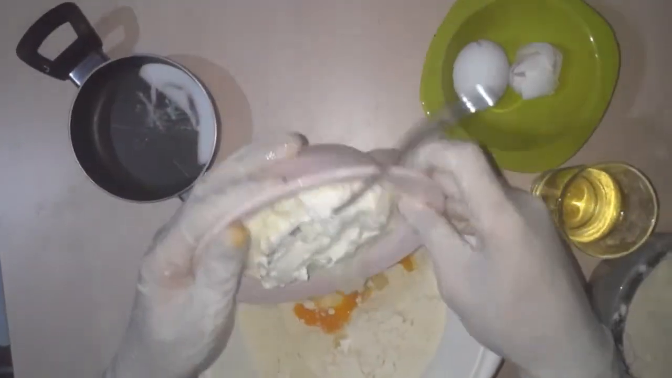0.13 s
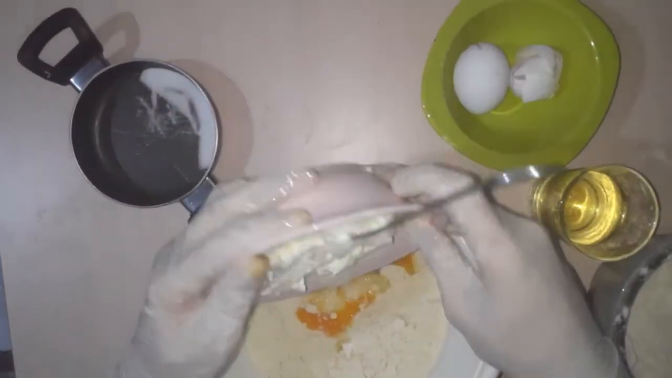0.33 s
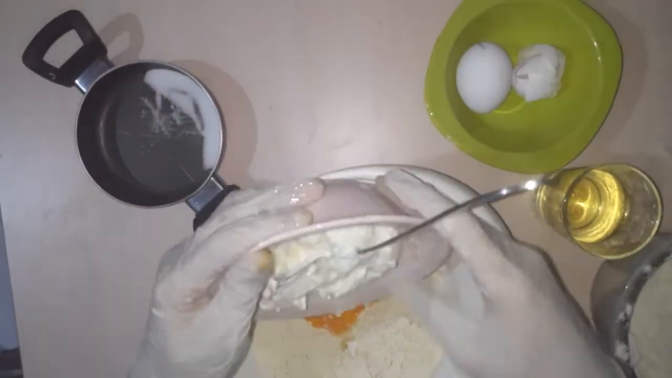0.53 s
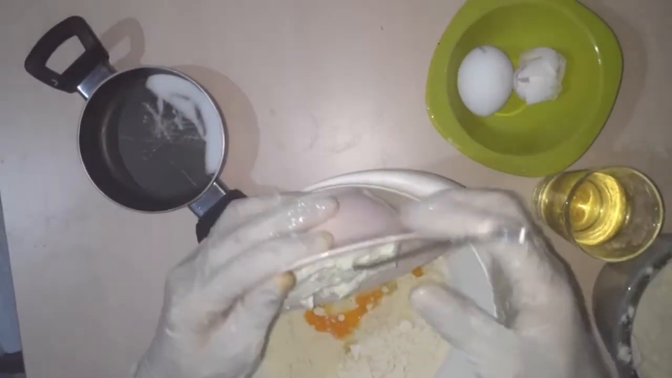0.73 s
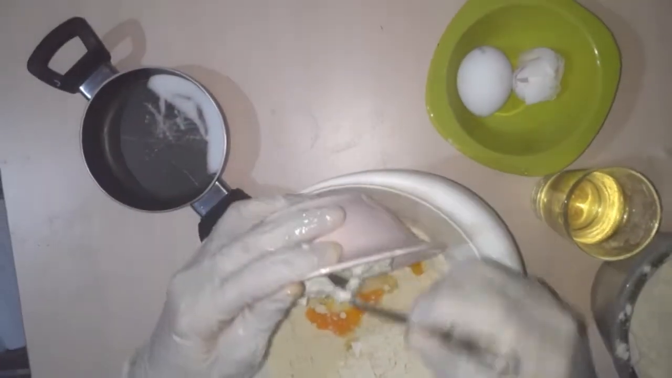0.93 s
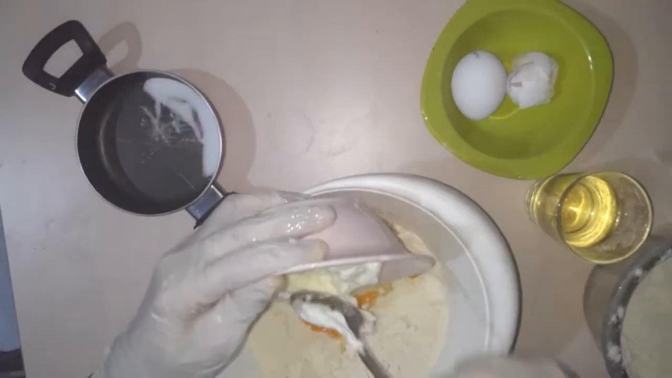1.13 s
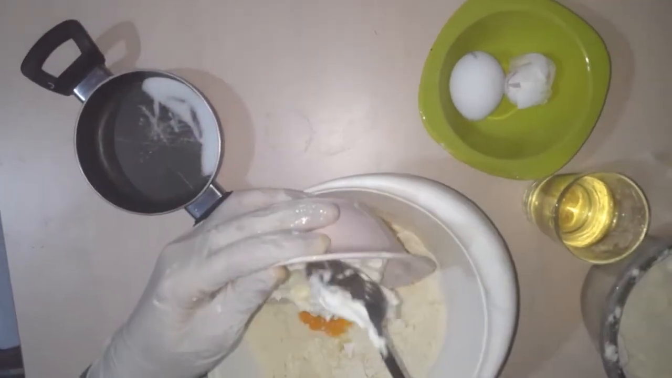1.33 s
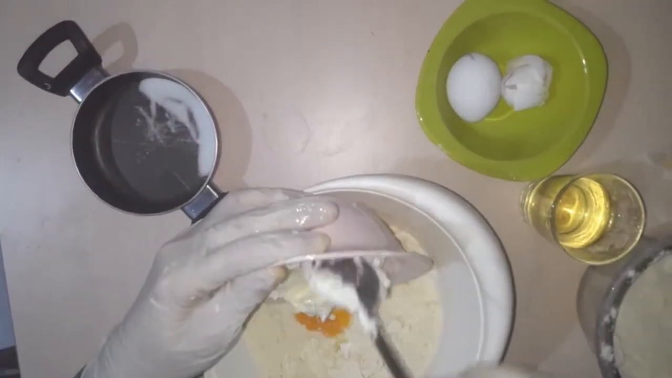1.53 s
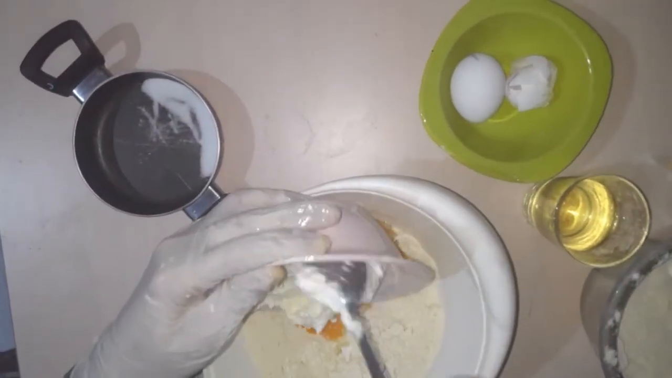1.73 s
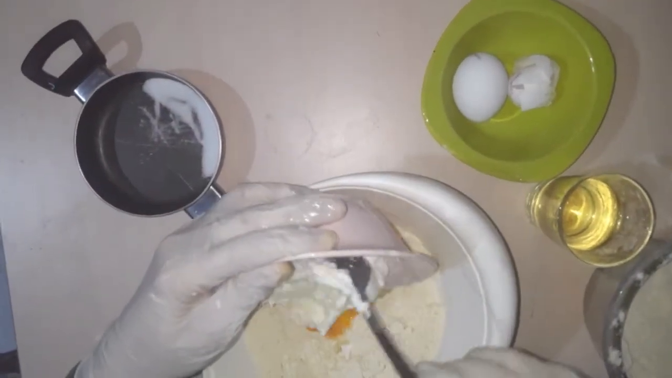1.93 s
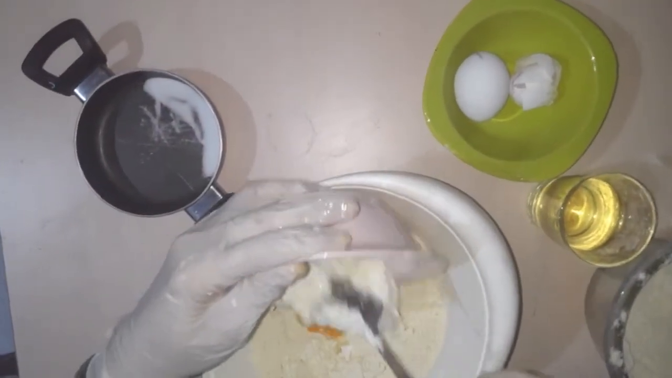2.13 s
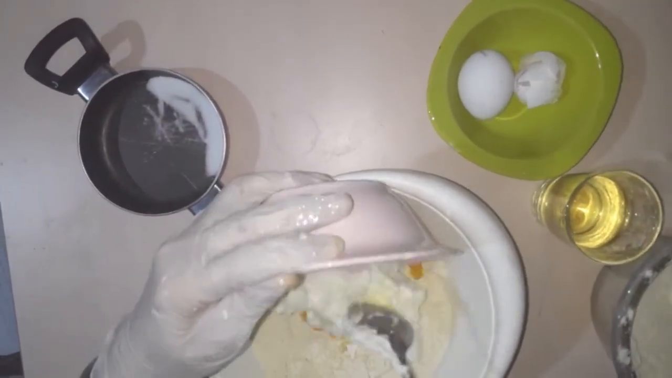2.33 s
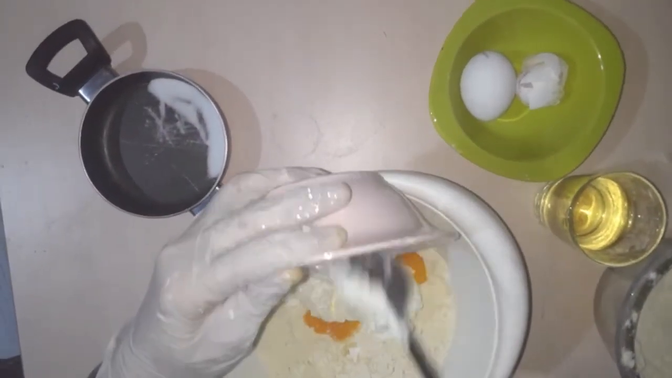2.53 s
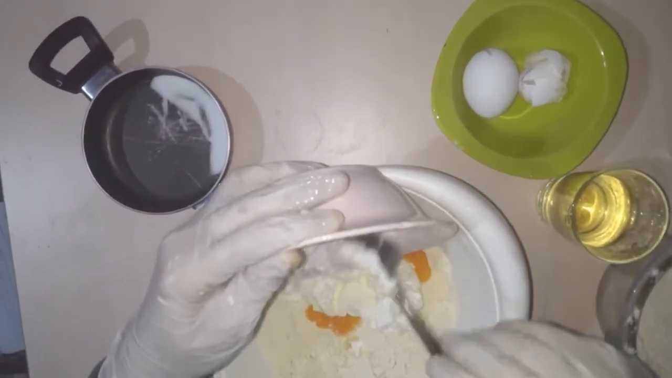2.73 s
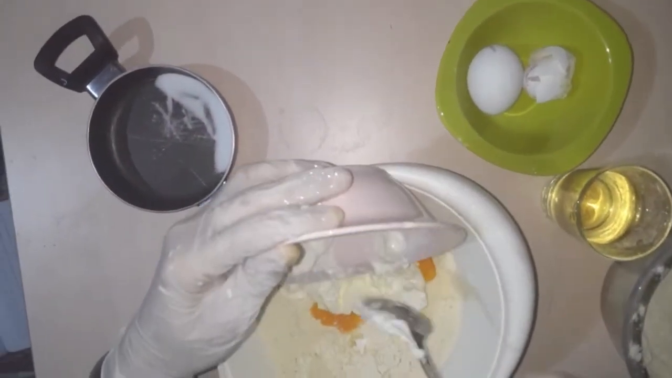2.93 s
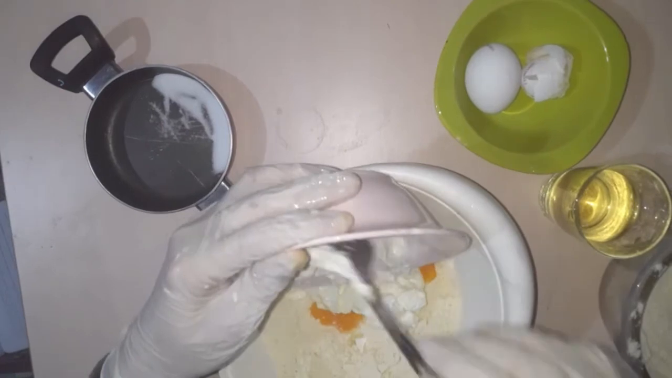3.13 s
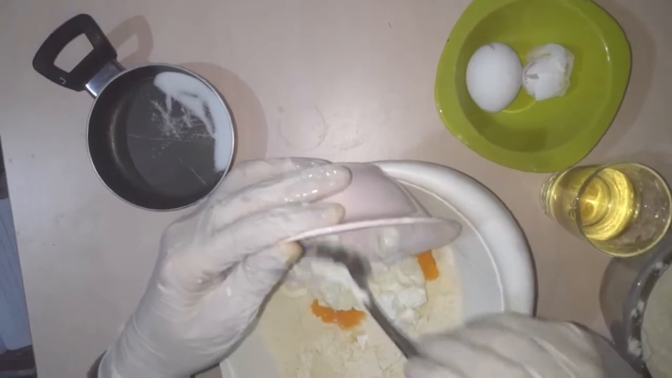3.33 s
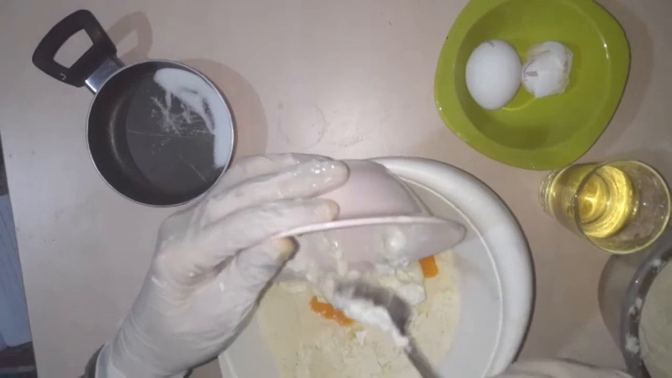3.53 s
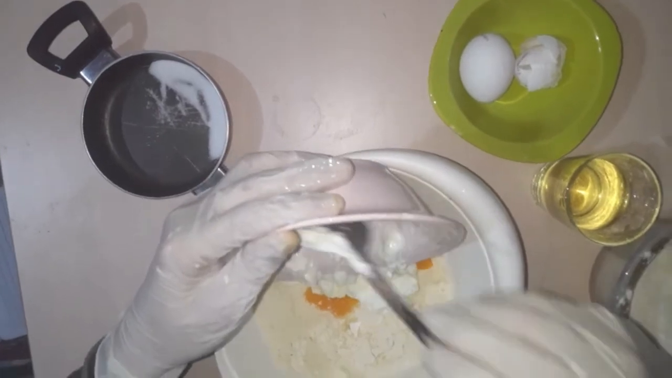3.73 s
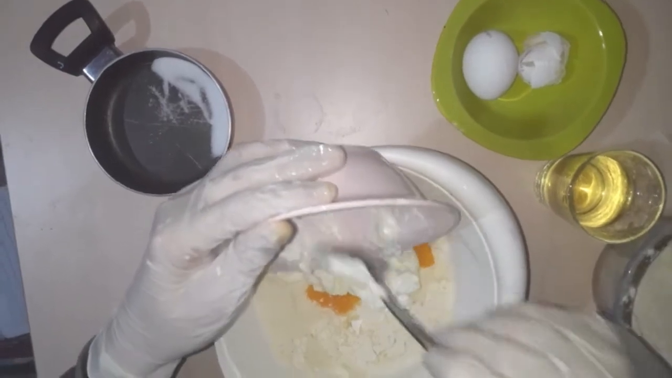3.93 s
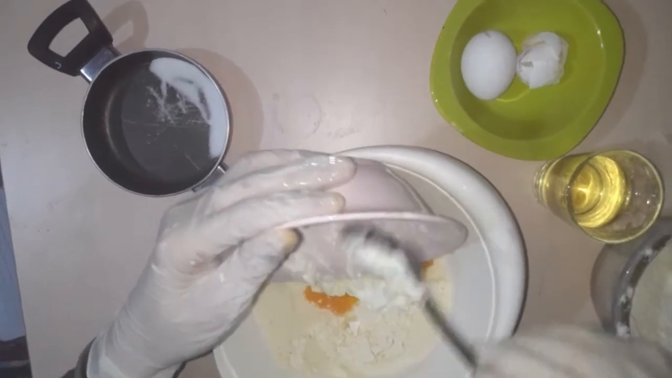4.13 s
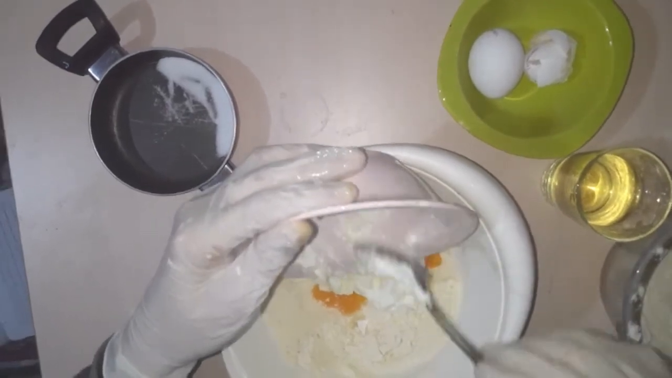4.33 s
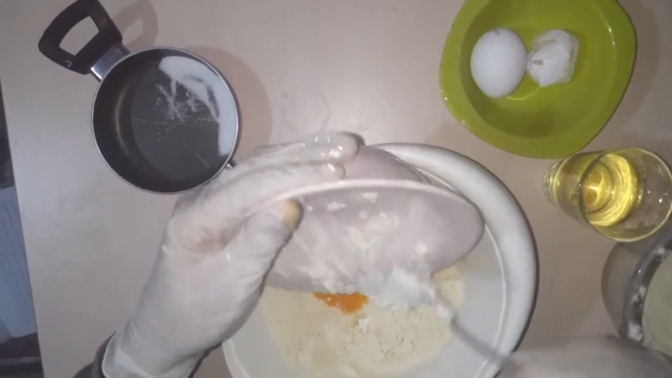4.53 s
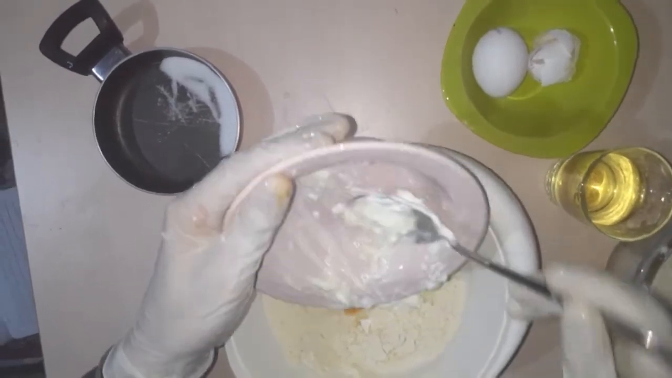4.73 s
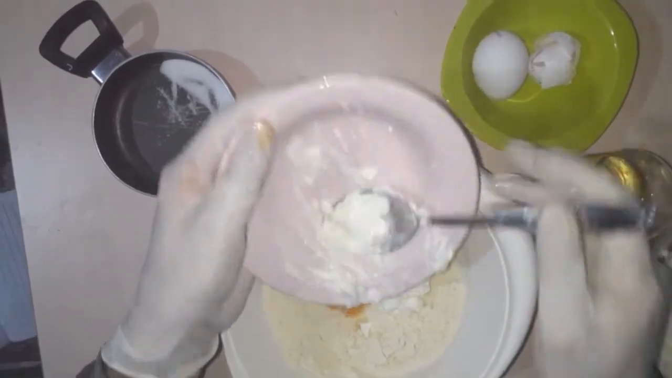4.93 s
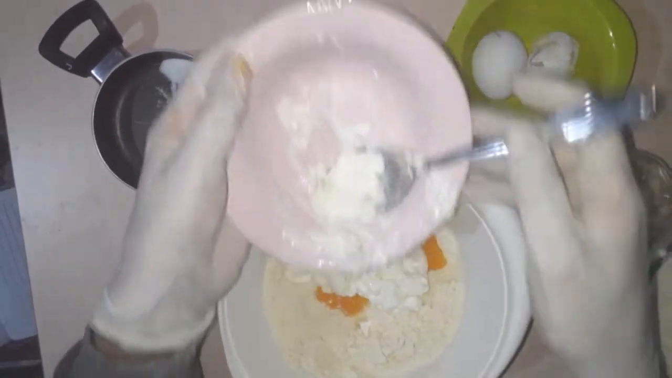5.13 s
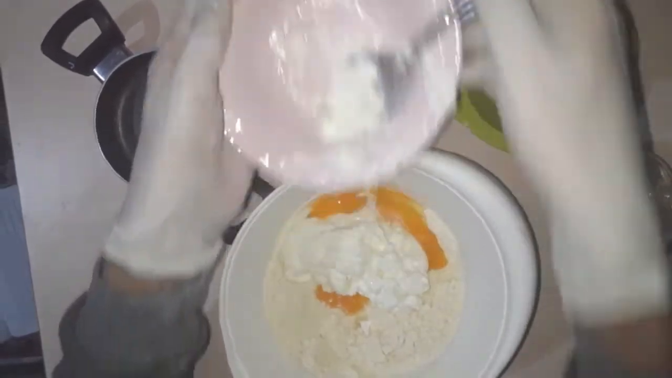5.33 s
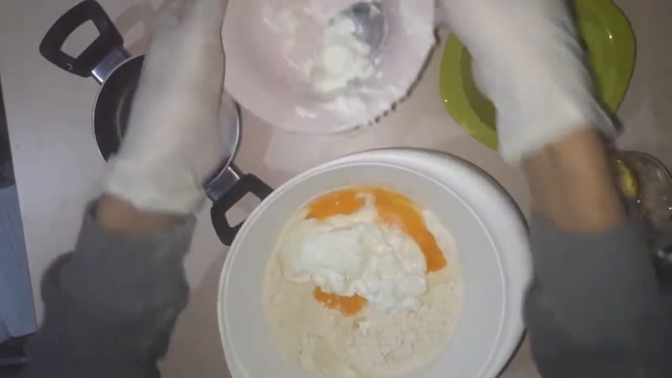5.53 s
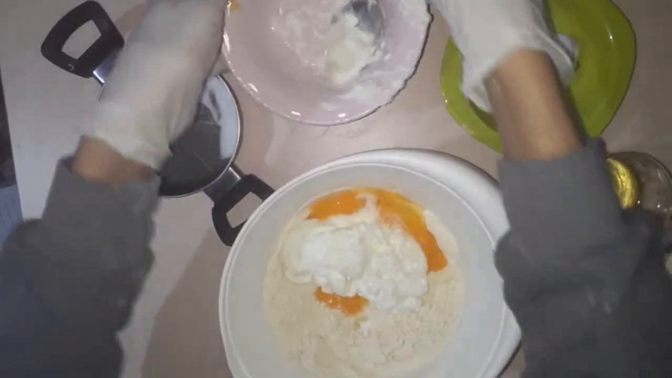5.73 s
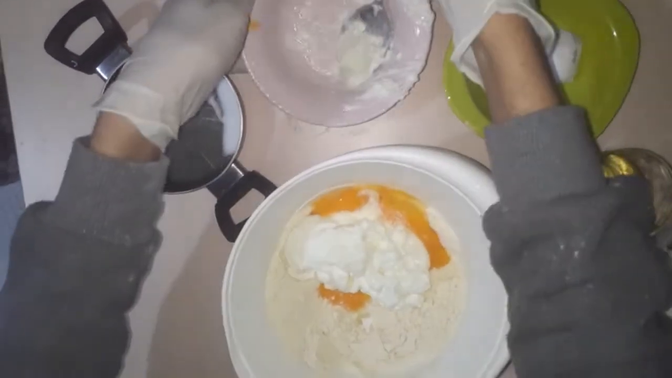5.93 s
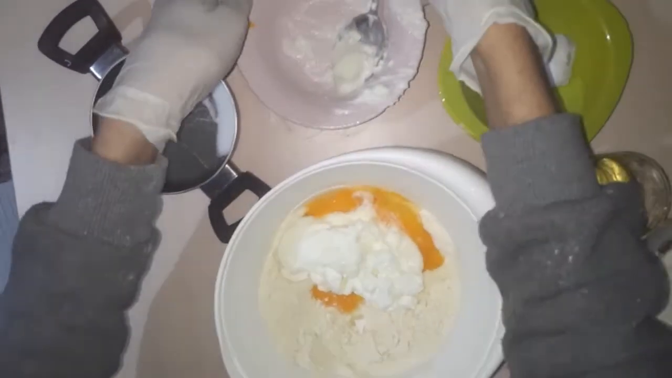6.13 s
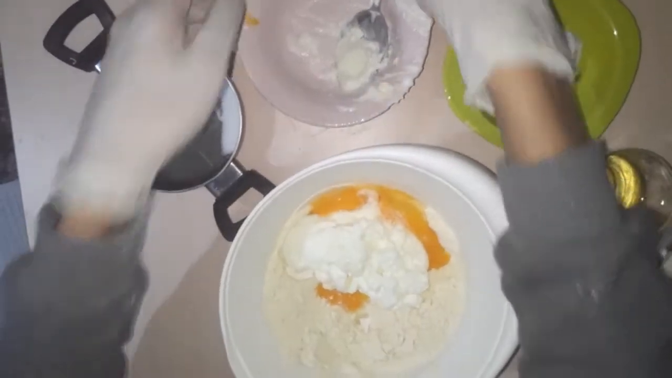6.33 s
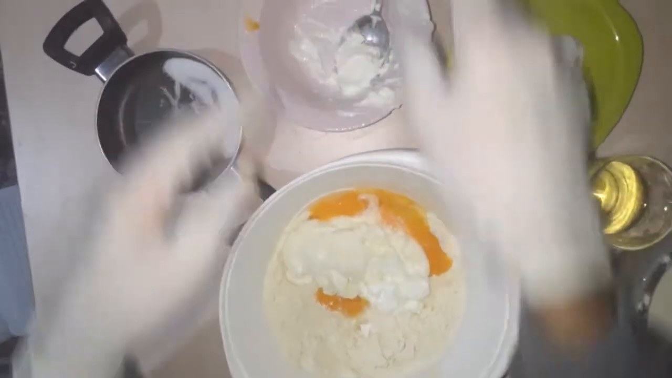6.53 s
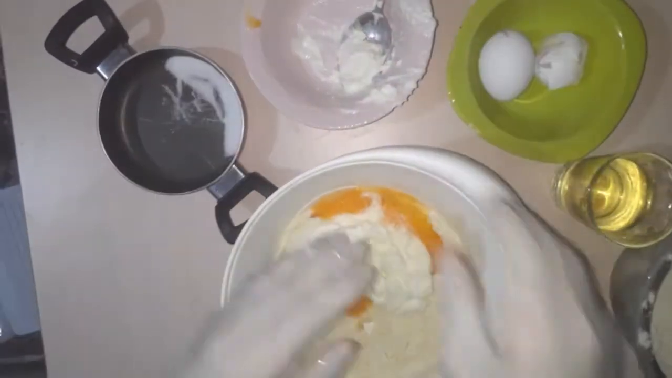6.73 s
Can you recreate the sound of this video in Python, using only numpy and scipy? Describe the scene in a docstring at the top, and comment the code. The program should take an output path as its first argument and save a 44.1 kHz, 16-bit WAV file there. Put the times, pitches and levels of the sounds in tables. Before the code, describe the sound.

In a small bare kitchen with a low fridge hum, a metal spoon scoops soft curd from a hand-held ceramic bowl. Quiet handling comes first, then sharp damped clinks, short scrapes, sticky squelches and soft lump thuds. Finally the bowl lands on the table with loud woody knocks and a spoon rattle. Close stereo microphone, spoon brighter on the left, short room reverberation.

```python
"""A fridge hums in a bare kitchen as the tail of a spoon rub, a light knock and a soft plop open the scene.
Close up, a steel spoon scoops soft curd from a small hand-held ceramic bowl into a mixing bowl: damped bowl modes
clink, stick-slip scrapes, small damped snaps squelch, lumps drop in falling thuds and gloves crackle in tiny grains.
Then the bowl is set down, exciting the table's modes, with the spoon rattling in it.
Gain control turns down for loud power and holds the lower level."""
import sys
import numpy as np
from scipy import signal
from scipy.fft import rfft, irfft
from scipy.io import wavfile
from scipy.ndimage import uniform_filter1d

SR = 44100
rng = np.random.default_rng(int(sys.argv[2]) if len(sys.argv) > 2 else 0)


def wav_record(signal):
    """Record a signal, one row per channel, as 16-bit PCM in the file named by sys.argv[1]."""
    frames = np.transpose(np.atleast_2d(signal))
    bounded = np.clip(frames, -1, 1)
    # unit amplitude maps onto the largest positive 16-bit level
    quanta = np.round(bounded * 32767).astype(np.int16)
    wavfile.write(sys.argv[1], SR, quanta)


N = 302952
TIME = np.arange(N) / SR
# Length of one rendered event, and the lead-in before its start [samples]
RING, LEAD = 32768, 1024

# Ways the spoon touches the bowl, in the order of the level columns below: (name)
CONTACT_NAMES = ("back", "edge", "tip", "rim", "loose", "rub")
# Spoon and bowl resonances, damped by hand and curd:
# (frequency [Hz], width [Hz], then one relative level [dB] per contact name)
BOWL_RESONANCES = [ (433, 200, -25.5, -23, -23, -32.5, -22.5, -41.5),
                   (617, 150, -20.5, -25, -23, -29, -20, -44),
                   (1138, 140, -14.5, -7.5, -13, -13, -1.5, -11.5),
                   (1344, 78, -3.5, -16.5, -25, -0.5, -16.5, 0),
                   (1603, 220, -2.5, -13, -20, -12.5, -21.5, -18.5),
                   (2007, 150, -4.5, -5, -19.5, -12, -6, 6.5), (2156, 100, -5.5, -13, -9, -2.5, -11.5, -17),
                   (2503, 190, -8, -23.5, -30, -11.5, 2, -19),
                   (2850, 220, 0.5, -7.5, -20.5, -16.5, -8, -20), (3166, 130, 2, 3, -20.5, 2, 1.5, -5),
                   (3646, 200, -4, -12.5, -14, -6, -2.5, -22),
                   (4055, 350, -6, -13.5, -12, -13, -14.5, -18.5),
                   (5050, 350, 2.5, -14, -19, -13, -6.5, -20.5),
                   (5552, 130, -12.5, -8, 4.5, -3, 2.5, -20.5), (6070, 210, -16, -6, -30, -23.5, -22, -29),
                   (6680, 350, -20, -22.5, -10.5, -5.5, -7, -31),
                   (7260, 200, -19.5, -18.5, -25, -10, -5, -32), (8650, 220, -28, -14, -25, -21.5, -6, -27),
                   (9720, 440, -32.5, -20, -18, -4.5, -5.5, -31),
                   (11440, 1000, -24.5, -25.5, -27, -14.5, -24.5, -35),
                   (13600, 2800, -31, -24.5, -28.5, -21.5, -35.5, -38.5),
                   (14700, 540, -34, -31.5, -32, -26, -39.5, -47)]
# Antiresonances between the bowl's modes: (frequency [Hz], width [Hz])
BOWL_ANTIRESONANCES = [(790, 290), (4620, 130), (8100, 380)]
# Each place of contact, by name: (shading of the right side by hand and bowl, before
# frequency weighting [dB], treble corner set by its hardness [Hz])
CONTACT_SOUND = {"back": (10, 7700), "edge": (8.5, 17000), "tip": (13, 16000), "rim": (2.5, 23000),
                 "loose": (4.5, 13200), "rub": (5.5, 13000)}
# Spoon meets bowl: (time [s], contact name, blow level before colouring [dB], room against direct [dB])
SPOON_CLINKS = [ (-.025, "rub", -29.5, -3), (.402, "back", -34.5, -4.5), (1.62, "back", -3.5, -4),
                (1.707, "edge", -2.5, -7), (2.415, "rub", -51.5, -5), (2.591, "tip", -10, -4),
                (2.842, "rub", -37, -6.5), (3.145, "tip", -4, -2.5), (3.7257, "tip", -12, 0),
                (4.203, "tip", -7.5, -6), (4.2115, "rim", -12.5, 0), (4.672, "tip", -5.5, 0),
                (4.851, "edge", -26, -8), (5.693, "loose", -10, -1), (5.891, "loose", -13.5, -2.5),
                (5.9545, "loose", -14.5, 3), (6.198, "loose", -9, -6)]
# A harder blow is brighter: tilt at 0 dB [dB per octave], and its change per dB of level
CLINK_TILT_DB, TILT_PER_DB = 0.56, 0.12
# The spoon bounces once after each blow: delay [s], level against the blow [dB]
BOUNCE_S, BOUNCE_DB = 0.0095, -17

# Table top resonances; widths below 14 Hz act as 14: (frequency [Hz], width [Hz], relative level [dB])
TABLE_RESONANCES = [(111, 15, -27), (145.5, 12, -2.5), (193.6, 13, -4.5), (270, 22, -8.5),
                    (291.7, 31.3, -0.5), (383.6, 17, 8.5), (480.6, 39.5, 2.5), (587, 36.6, -2),
                    (662.8, 23, 2), (712, 13, -4), (873, 120, -9.5), (1077, 200, -16.5), (1190, 160, -15),
                    (1576, 300, -12.5), (2260, 460, -30.5), (3160, 53, -24), (5000, 2600, -36)]
# Crockery knocks on the table:
# (time [s], blow level before colouring [dB], rocking time [s], brightness [dB per octave])
TABLE_KNOCKS = [(-.015, -26.5, .005, 2.5), (1.025, -51.5, .005, 3), (5.9363, -3, .028, -1.5),
                (6.118, -3.5, .005, -2.5), (6.2, -18.5, .005, -21.5)]
# Time between touches of the rocking foot [s]
ROCK_S = 0.0113

# A lump of curd lands in the mixing bowl: (time [s], level of each thud before colouring [dB])
LUMP_LANDINGS = [(-.002, -31.5), (1.732, -30.5), (2.63, -38.5), (3.3, -32.5)]

# Motor speed, and its hum: (multiple of the motor speed, rms level before waver and balance [dB])
FRIDGE_HZ = 49.05
FRIDGE_HARMONICS = [(1, -60), (2, -64.5), (3, -54), (4, -54.5), (5, -69.5), (6, -78.5), (7, -80), (8, -68),
                    (9, -68.5), (10, -72), (12, -75.5), (13, -79), (15, -82.5)]
# Colour of the kitchen's steady air noise: (frequency [Hz], relative density [dB per Hz])
AIR_SPECTRUM = [(25, -11), (70, -5), (180, -1.5), (400, -2), (700, -9.5), (1200, -14.5), (2200, -20),
                (3500, -30), (5200, -25.5), (9000, -34), (15000, -28)]
# Air noise rms before balance; then how much the left rises and the right falls
AIR_DB, AIR_LEFT_DB = -62, 2.5

# A move of the hands swells and fades: (middle [s], time to fade by about 9 dB either way,
# its sign has no effect [s], level before room [dB])
GLOVE_MOVES = [(0, 0.07, -56), (.47, 0.37, -66.5), (.88, -0.07, -62), (2.16, .08, -69), (4.98, 0.9, -77.5),
               (5.52, 0.2, -74.5), (5.65, 0.1, -58)]
# Colour of rubber and cloth: (frequency [Hz], width [Hz], relative level [dB])
RUSTLE_RESONANCES = [(2200, 900, -3), (5900, 3000, 9), (12400, 5200, -7)]

# Small damped snaps: wet curd, light spoon touches on the mixing bowl, a glove crackle:
# (time [s], level before room [dB], pitch [Hz])
DAMPED_SNAPS = [(.115, -51, 10300), (.81, -58.5, 10100), (.879, -47.5, 2600), (1.368, -59, 4772),
                (1.454, -56, 2380), (5.43, -54, 6310)]

# The spoon drags over the glaze: (start [s], length [s], level before room [dB], nominal slip rate [per s])
GLAZE_SCRAPES = [(0.225, 0.061, -60, 1630), (2.51, 0.056, -54, 1230), (2.739, .11, -48, 3200),
                 (2.823, 0.039, -35.5, 2070), (3.351, 0.052, -44, 1760), (3.863, 0.054, -41, 1050),
                 (3.907, 0.048, -47, 1800), (4.332, 0.079, -49, 1070)]
# Slow slips come unevenly, fast ones lock into a squeak: log-spread of spacing, at this rate [per s]
SLIP_SPREAD, SLIP_HZ = 0.13, 2002

# Reverberation: (frequency [Hz], time to fall by 60 dB [s])
KITCHEN_DECAY = [(120, 0.22), (400, 0.34), (1200, 0.4), (3000, 0.36), (6000, 0.29), (10000, 0.29),
                 (15000, .29)]
# How strongly shading acts: (frequency [Hz], factor on the shading in dB)
SHADE_WEIGHT = [(200, 2.4), (1500, 1.4), (3500, 2.1), (5500, 1.2), (8500, 0.66), (14000, 0.57)]
# Longest smear of the direct sound, and the right port's extra delay [s]
SCATTER_S, PORT_LAG_S = 0.0036, 0.00008
# Recorder's upper cutoff
TOP_HZ = 15400


def undb(db):
    """Decibels to gain."""
    return 10 ** (np.asarray(db) / 20)


def unit(x):
    """Scale to rms 1."""
    return x / np.sqrt(np.mean(np.abs(x) ** 2))


def freqs(size):
    """Frequencies of a spectrum, kept above zero."""
    return np.maximum(np.fft.rfftfreq(size, 1 / SR), 1)


def over_hz(points, hz):
    """Read (frequency [Hz], value) points on a log-frequency axis."""
    at, value = np.transpose(points)
    return np.interp(np.log(hz), np.log(at), value)


def add(out, start, spectrum):
    """Mix in a stereo event from its spectrum, with a short lead-in and faded ends."""
    sound = np.roll(irfft(spectrum), LEAD, axis=1) * signal.windows.tukey(RING, LEAD / RING)
    first = int(start * SR) - LEAD
    begin, end = max(first, 0), min(first + RING, N)
    out[:, begin:end] += sound[:, begin - first:end - first]


def resonance(hz, width, size=RING):
    """One damped mode, gain 1 at its centre."""
    f = freqs(size)
    return 1 / (1 + 1j * (f * f - hz * hz) / (f * max(width, 14)))


def body(modes, tilt_db=0, size=RING):
    """Sum a body's resonances; harder contact tilts them towards the treble."""
    response = sum(undb(db) * resonance(hz, width, size) for hz, width, db in modes)
    # the tilt levels off below half the first mode
    octaves = np.log2(np.hypot(freqs(size), modes[0][0] / 2))
    return unit(response * undb(tilt_db * octaves))


def bowl_modes(contact):
    """The place of contact decides how strongly each bowl mode is driven."""
    column = 2 + CONTACT_NAMES.index(contact)
    return [(row[0], row[1], row[column]) for row in BOWL_RESONANCES]


def soften(corner_hz):
    """A contact of finite length loses drive in the highest frequencies."""
    return 1 / (1 + 1j * freqs(RING) / corner_hz) ** 2


def radiation(corner_hz):
    """A body small against the wavelength hardly moves the air: a second-order bass cut."""
    s = 1j * freqs(RING) / corner_hz
    return s * s / (s * s + np.sqrt(2) * s + 1)


def scatter():
    """Bowls and hands nearby smear the direct sound: each frequency arrives up to a few ms late."""
    knots = np.linspace(0, SR / 2, 48)
    delay = SCATTER_S * np.interp(freqs(RING), knots, rng.random(len(knots)))
    return np.exp(-2j * np.pi * np.cumsum(delay) * SR / RING)


def two_ports(spectra, alike_hz=650):
    """Diffuse sound at two close microphone ports: alike in the bass, unrelated in the treble."""
    f = freqs(2 * (spectra.shape[1] - 1))
    alike = 1 / (1 + (f / alike_hz) ** 4)
    shared = spectra[0] * np.sqrt(1 + alike)
    opposed = spectra[1] * np.sqrt(1 - alike)
    return (shared + np.array([[1], [-1]]) * opposed) / np.sqrt(2)


def reverb(onset_s=0.002, grain=0.091, left_db=1):
    """Grainy wall reflections decay at a rate set by frequency; drawn anew at each call."""
    t = np.arange(RING) / SR
    noise = rng.standard_normal((2, RING)) * np.exp(grain * rng.standard_normal((2, RING)))
    f, s, bins = signal.stft(noise, SR, nperseg=256)
    decay = np.exp(-np.log(1000) * s / over_hz(KITCHEN_DECAY, f + 1)[:, None])
    tail = signal.istft(bins * decay, SR)[1][:, :RING]
    # silent for half the onset, then rising to full
    onset = np.clip(2 * t / onset_s - 1, 0, 1)
    response = two_ports(rfft(tail * onset))
    return unit(response) * undb([[left_db], [-left_db]])


def path(shade_db, room_db, room_shade=0.088):
    """Direct sound plus room; the right is later, shaded and differently scattered in the treble."""
    f, left, other = freqs(RING), scatter(), scatter()
    alike = 1 / np.hypot(1, (f / 1500) ** 2)
    right = alike * left + np.sqrt(1 - alike ** 2) * other
    right = right * np.exp(-2j * np.pi * f * PORT_LAG_S)
    shade = shade_db * over_hz(SHADE_WEIGHT, f)
    # the room takes a small share of the shading, split between the sides
    room = undb(room_db + room_shade * shade * np.array([[.5], [-.5]])) * reverb()
    return np.array([left, right * undb(-shade)]) + room


def blow(modes, db, tilt_db, shade_db, room_db):
    """Spectrum of one impact; its level is that of its energy packed into the scatter time."""
    return undb(db) * np.sqrt(SCATTER_S * SR) * body(modes, tilt_db) * path(shade_db, room_db)


def spoon(low_hz=290, dip_depth=0.42):
    """Steel strikes ceramic: each clink rings the bowl's modes and bounces once."""
    dips = np.prod([1 - dip_depth * resonance(hz, width) for hz, width in BOWL_ANTIRESONANCES], axis=0)
    bounce = 1 + undb(BOUNCE_DB) * np.exp(-2j * np.pi * freqs(RING) * BOUNCE_S)
    colour = dips * bounce * radiation(low_hz) ** 2
    out = np.zeros((2, N))
    for start, contact, db, room_db in SPOON_CLINKS:
        shade_db, corner_hz = CONTACT_SOUND[contact]
        tilt_db = CLINK_TILT_DB + TILT_PER_DB * db
        clink = blow(bowl_modes(contact), db, tilt_db, shade_db, room_db)
        add(out, start, clink * colour * soften(corner_hz))
    return out


def table(shade_db=1.5, room_db=3.0, low_hz=125, corner_hz=3700):
    """Crockery knocks ring the table top; a rocking foot repeats the blow."""
    colour = radiation(low_hz) ** 2 * soften(corner_hz)
    out = np.zeros((2, N))
    for start, db, rocks_s, tilt_db in TABLE_KNOCKS:
        for delay in np.arange(0, rocks_s, ROCK_S):
            knock = blow(TABLE_RESONANCES, db, tilt_db, shade_db, room_db)
            add(out, start + delay, knock * colour)
    return out


def plops(slump_s=0.037, first_hz=290, fall=0.58, width_share=0.9, shade_db=4, room_db=-3, count=3):
    """A lump slaps down and slumps in soft thuds, each lower in pitch and driven at the same level."""
    out = np.zeros((2, N))
    for start, db in LUMP_LANDINGS:
        for k in range(count):
            hz = first_hz * fall ** k
            thud = blow([(hz, hz * width_share, 0)], db, 0, shade_db, room_db)
            add(out, start + k * slump_s, thud * radiation(hz / 2) * soften(2 * hz))
    return out


def walk(rate):
    """A slow random wander through rate points per second, of spread near 1."""
    return np.interp(TIME * rate, np.arange(N // 100), rng.standard_normal(N // 100))


def fridge(waver_db=0.66, phase_drift=0.08, left_db=2):
    """Compressor hum: harmonics of the motor speed, each wavering a little in level and phase."""
    hum = 0
    for multiple, db in FRIDGE_HARMONICS:
        phase = 2 * np.pi * (multiple * FRIDGE_HZ * TIME + rng.random()) + phase_drift * walk(2.3)
        hum = hum + np.sqrt(2) * undb(db + waver_db * walk(11)) * np.sin(phase)
    return hum * undb([[left_db], [-left_db]])


def air():
    """Soft diffuse noise under everything, shaped by frequency."""
    noise = two_ports(rfft(rng.standard_normal((2, N)))) * undb(over_hz(AIR_SPECTRUM, freqs(N)))
    return unit(irfft(noise, N)) * undb(AIR_DB + np.array([[AIR_LEFT_DB], [-AIR_LEFT_DB]]))


def gloves(grains_per_s=1500, uneven_db=6, shade_db=3, room_db=0, resting_db=-90):
    """Rubber and cloth crackle in tiny uneven grains as the hands move."""
    motion = undb(resting_db)
    for middle, fade_s, db in GLOVE_MOVES:
        motion = motion + undb(db) * np.exp(-((TIME - middle) / fade_s) ** 2)
    grains = (rng.random(N) < grains_per_s / SR) * undb(uneven_db * rng.standard_normal(N))
    rustle = unit(irfft(rfft(grains) * body(RUSTLE_RESONANCES, size=N), N)) * motion
    response = irfft(path(shade_db, room_db))[:, :RING // 2]
    return signal.fftconvolve(rustle[None], response, axes=1)[:, :N]


def damped_snaps(width_share=0.37, snap_s=0.015, shade_db=3, room_db=-2, count=4):
    """Small snaps come a few at a time, each a strongly damped resonance with steep flanks."""
    out = np.zeros((2, N))
    for start, db, hz in DAMPED_SNAPS + peeling():
        delays = snap_s * np.arange(count) * rng.uniform(0.91, 1, count) / count
        # each later snap is weaker
        snaps = sum(np.exp(-2j * np.pi * freqs(RING) * delay) / (k + 1) for k, delay in enumerate(delays))
        burst = unit(snaps * body([(hz, hz * width_share, 0)]) ** 2)
        add(out, start, undb(db) * np.sqrt(SCATTER_S * SR) * burst * path(shade_db, room_db))
    return out


def scraping(uneven_db=4, corner_hz=8500, shade_db=4, room_db=-6):
    """Steel sticks and slips on glaze; the more even the slips, the more the bowl squeaks."""
    out = np.zeros((2, N))
    for start, length, db, rate in GLAZE_SCRAPES:
        spacing, size = rng.standard_normal((2, 2048))
        at = np.cumsum(np.exp(SLIP_SPREAD * SLIP_HZ / rate * spacing)) / rate
        pressure = np.sqrt(np.abs(np.sin(np.pi * np.minimum(at / length, 1))))
        strength = pressure * undb(uneven_db * size)
        slips = np.bincount((at * SR).astype(int), strength, RING)[:RING]
        ringing = unit(rfft(slips) * soften(corner_hz) * body(bowl_modes("rub")) * radiation(700))
        add(out, start, ringing * np.sqrt(length * SR) * undb(db) * path(shade_db, room_db))
    return out


def sliding_lump(start=1.9, length=0.41, db=-64.0, hz=1700, width_hz=1500, grains_per_s=700, uneven_db=5):
    """A lump slides out of the bowl with a soft, sticky crackle of random grains."""
    swell = np.sin(np.pi * np.minimum(np.arange(RING) / SR / length, 1))
    grains = (rng.random(RING) < grains_per_s / SR) * undb(uneven_db * rng.standard_normal(RING)) * swell
    crackle = unit(rfft(grains) * body([(hz, width_hz, 0)]) ** 2)
    out = np.zeros((2, N))
    add(out, start, crackle * np.sqrt(length * SR) * undb(db) * path(shade_db=1, room_db=-7))
    return out


def peeling(start=2.023, gap_s=0.039, db=-43, ends_db=-5, weak_db=-5, first_hz=4000, last_hz=9800, count=5):
    """A lump peels off: ever smaller air pockets open, strong and weak by turns, loudest halfway."""
    pockets = []  # (time [s], level [dB], pitch [Hz])
    for k, hz in enumerate(np.geomspace(first_hz, last_hz, count)):
        from_middle = abs(2 * k / (count - 1) - 1)
        level_db = db + ends_db * from_middle + weak_db * (k % 2)
        pockets.append((start + k * gap_s, level_db, hz))
    return pockets


def scene():
    """Everything on and around the kitchen table."""
    handling = spoon() + table() + plops()
    kitchen = fridge() + air()
    return handling + kitchen + gloves() + damped_snaps() + scraping() + sliding_lump()


def record(dry, threshold_db=-8, window_s=0.022):
    """Gain control ducks by the excess power and holds; peaks clip; the top is cut."""
    power = uniform_filter1d(np.mean(dry ** 2, axis=0), int(window_s * SR))
    excess_db = np.maximum(10 * np.log10(np.abs(power) + 1e-12) - threshold_db, 0)
    # the largest excess so far sets the reduction
    duck_db = np.maximum.accumulate(excess_db)
    clipped = np.clip(dry * undb(-duck_db), -1, 1)
    return signal.sosfilt(signal.ellip(8, .2, 70, TOP_HZ, fs=SR, output="sos"), clipped)


dry = scene()
out = record(dry)
wav_record(out)
```